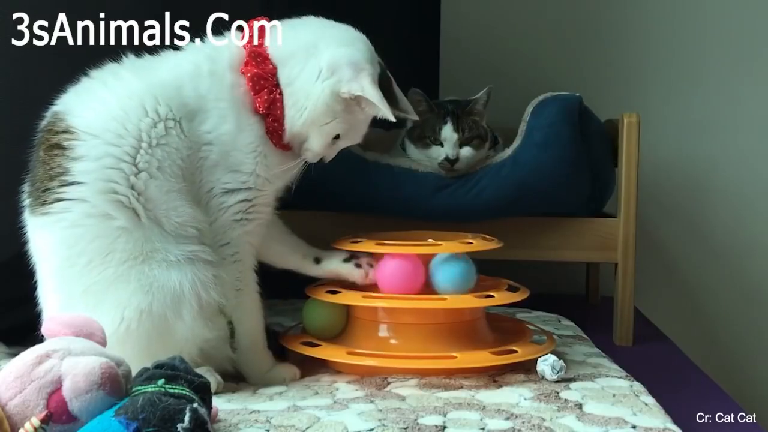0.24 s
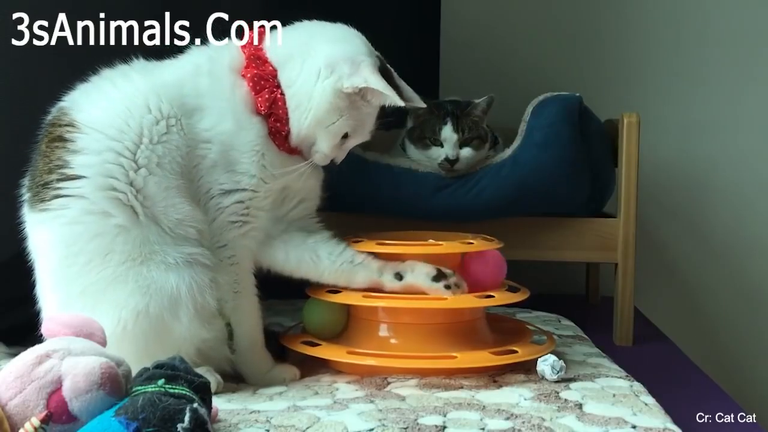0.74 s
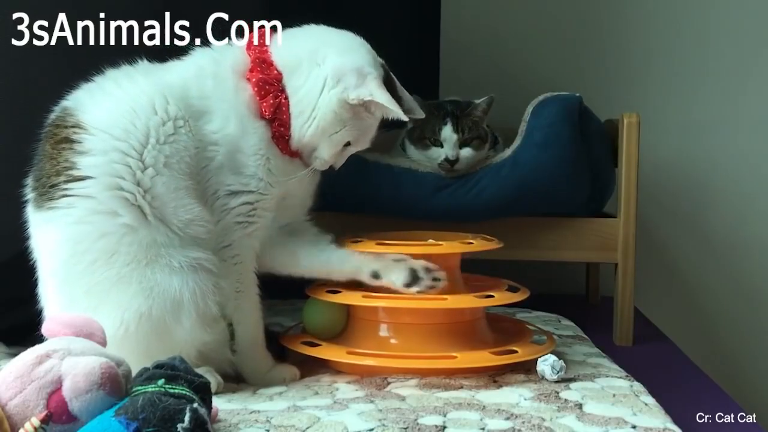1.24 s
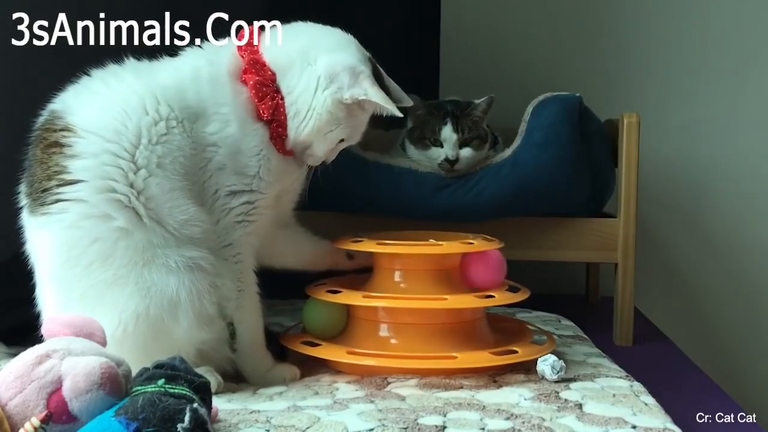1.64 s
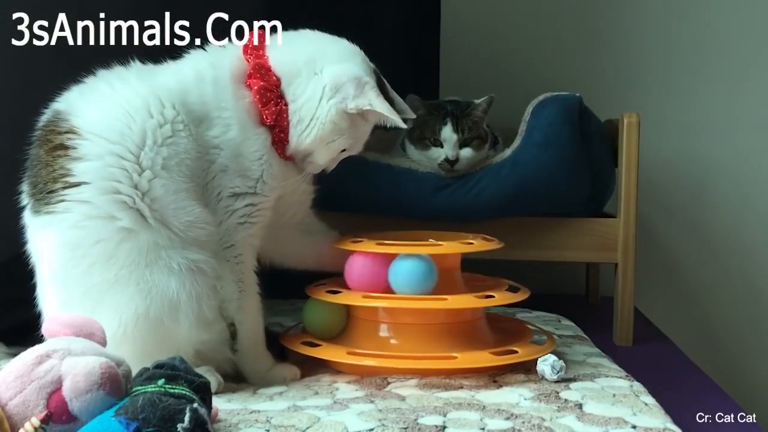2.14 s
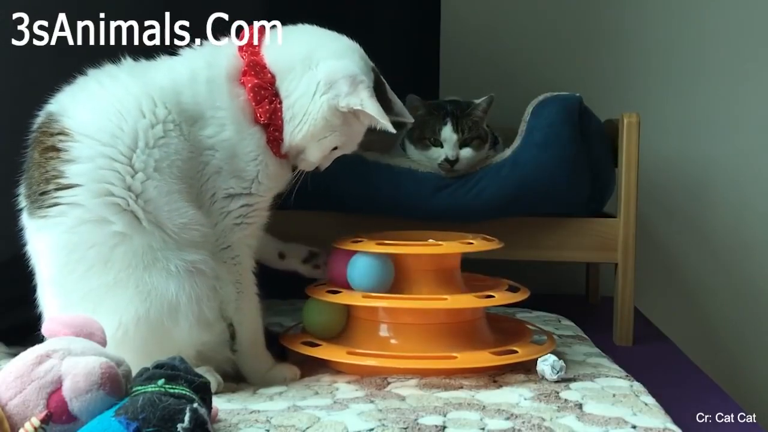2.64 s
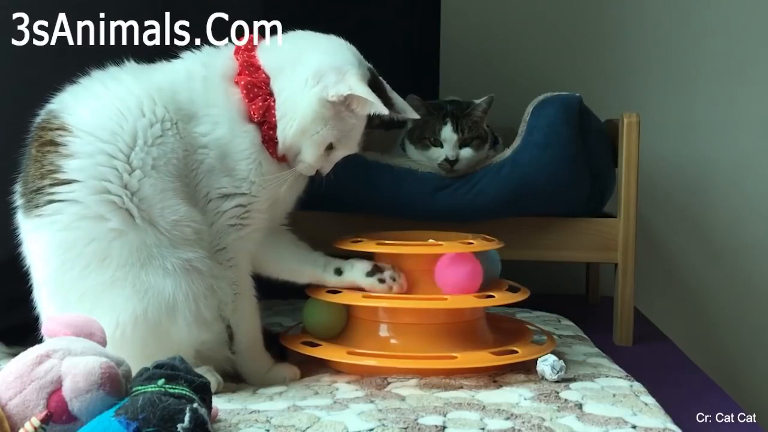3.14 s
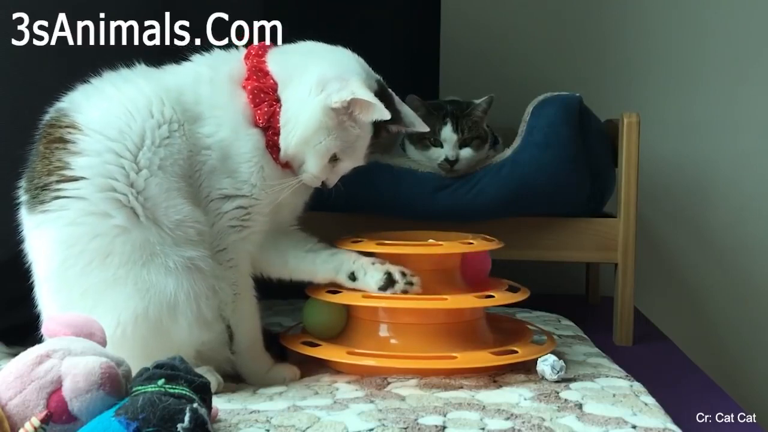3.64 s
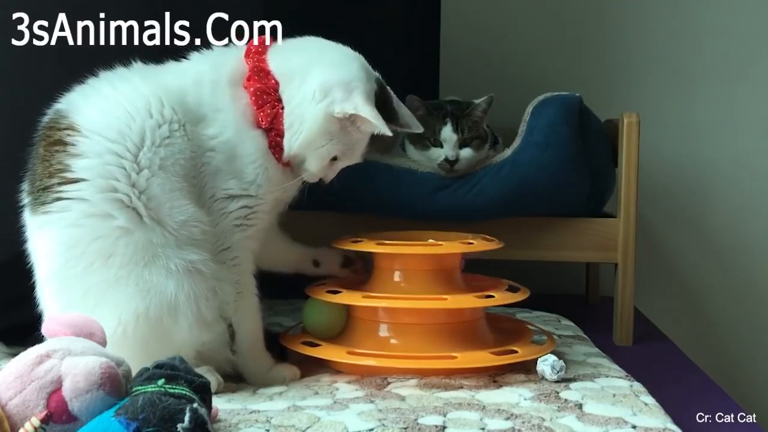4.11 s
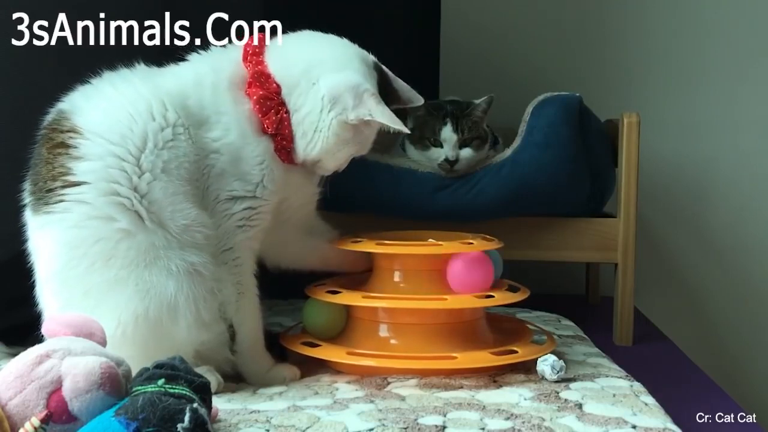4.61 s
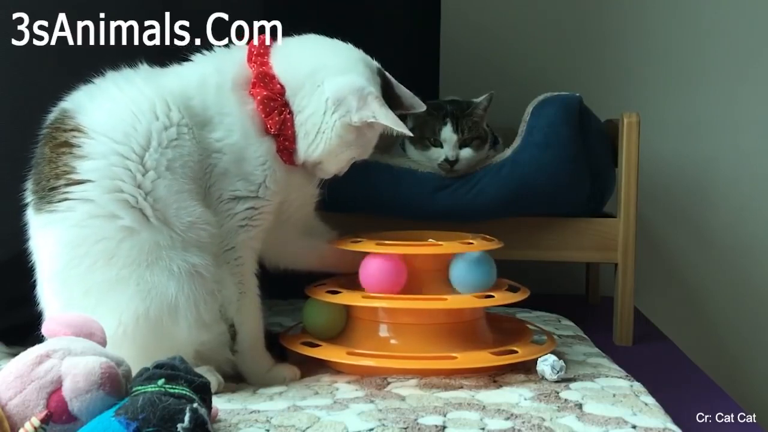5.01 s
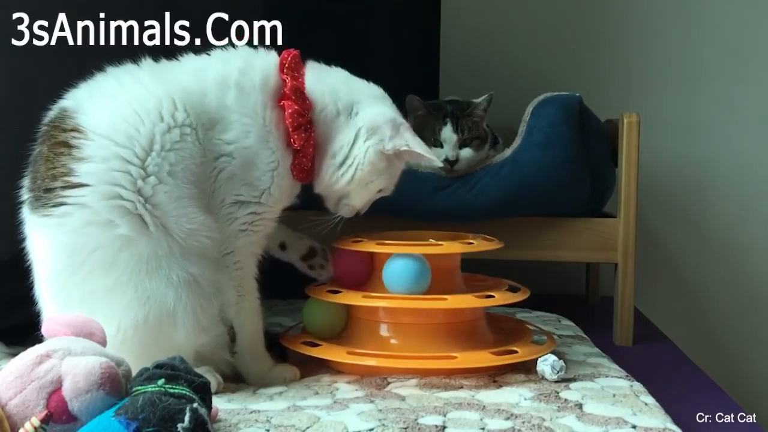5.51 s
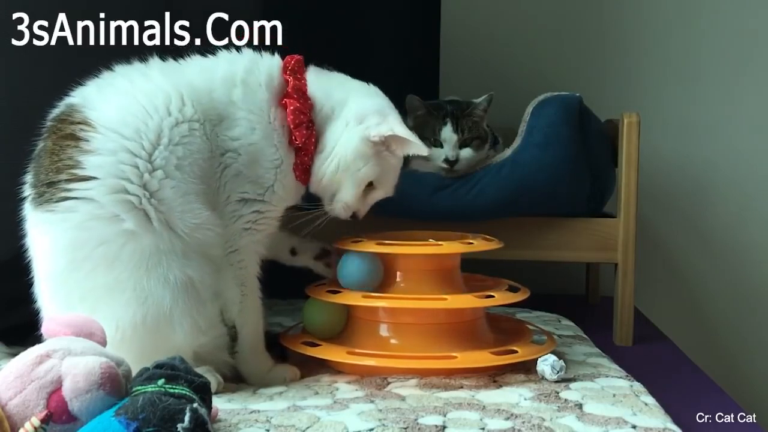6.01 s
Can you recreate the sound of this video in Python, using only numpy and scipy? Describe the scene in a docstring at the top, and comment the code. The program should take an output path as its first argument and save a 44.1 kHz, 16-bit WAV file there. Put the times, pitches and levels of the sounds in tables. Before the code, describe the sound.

A cat bats hollow plastic balls around a tiered plastic track. Quick clusters of dry clacks come at the start, after a second and a half, near three seconds and just after four, with faint rolling and grainy hisses between. A small pad squeak comes near five seconds, then a few weak ticks. A low machine hum runs beneath. Close single microphone, small room with short echoes.

```python
"""Hollow plastic balls clack in a tiered plastic track as a cat paws them, in a small room with close walls.
Each hit rings modes of ball, rim and tray under a short noise crack; a fainter, duller repeat comes soon after.
Pulses make the balls roll and skitter, short grainy hisses swell, and square hits ring the whole tower.
Fur brushes the rim as soft noise, and a paw pad squeaks once as a rough tone of wavering pitch.
Behind the toy a machine hums: steady tones, a drone that swells and dies away, rumble and airy hiss."""
import sys
import numpy as np
from scipy import signal
from scipy.fft import rfft, irfft
from scipy.io import wavfile

SR = 44100
rng = np.random.default_rng(int(sys.argv[2]) if len(sys.argv) > 2 else 0)


def int16_out(signal):
    """Quantize to a 16-bit WAV file."""
    q = np.round(np.clip(np.atleast_2d(signal).T, -1, 1) * 32767)
    wavfile.write(sys.argv[1], SR, q.astype(np.int16))


N = 276154
TIME = np.arange(N) / SR

# steady machine tones, mean level before they waver: [f/Hz, level/dB]
HUM_TONES = [(59.7, -50), (119, -62.5), (153.5, -60.5), (188, -64.5), (220.6, -53.5), (251.7, -65.5),
             (345, -69.5)]
# the drone swells and dies away: [t/s, level/dB]
DRONE_LEVEL = [(0.08, -46.5), (1.02, -48), (1.25, -40.5), (3.05, -39), (3.25, -51.5), (6.0, -52)]
DRONE_HZ = 93.55
# spectrum of the airy hiss: [f/Hz, relative level/dB]
AIR_COLOUR = [(200, -19.5), (400, -4), (500, -8.5), (740, -9.5), (1000, -11), (1290, -1.5), (1480, -6.5),
              (1900, -8.5), (2500, -16.5), (4500, -22), (7400, -24.5), (8800, -23.5), (10200, -30.5),
              (16000, -32.5)]
AIR_DB = -64.5
# spectrum of the low rumble: [f/Hz, relative level/dB]
RUMBLE_COLOUR = [(20, -48), (31, -20), (39, -16.5), (50, 0), (69, -7.5), (84, 1), (104, -6.5), (135, -11),
                 (172, -13.5), (260, -17.5), (330, -24.5), (450, -32), (700, -60)]
# level of the rumble: [t/s, level/dB]
RUMBLE_LEVEL = [(0.3, -42.5), (0.75, -47), (1.3, -44), (4.3, -45.5), (5.7, -47), (6.1, -44)]

# time for the room's echoes to fall 60 dB: [f/Hz, t60/s]
ROOM_T60 = [(250, 0.15), (1000, 0.19), (3500, 0.29), (9000, 0.23), (16000, 0.18)]
# colour of the room's echoes: [f/Hz, relative level/dB]
ROOM_COLOUR = [(330, -1), (550, 0), (950, -5), (1400, -0.5), (2400, 1), (5000, 0.5), (9000, -1.5)]
# echoes a second at first; time over which they crowd together (s)
ECHOES_PER_S, CROWDING_S = 500, 0.03
# the room decays separately in seven octave bands
EDGES = np.geomspace(125, 16000, 8)
OCTAVES = [(np.sqrt(low * high), signal.butter(2, [low, high], "band", fs=SR, output="sos"))
           for low, high in zip(EDGES, EDGES[1:])]

# fur brushing the rim: [start t/s, fade length/s, level/dB]
BRUSHES = [(0.429, .17, -60.5), (0.815, 0.16, -61), (5.942, 0.04, -63.5), (6.021, 0.033, -58.5)]
# spectrum of fur on plastic, and of the pad's rasp: [f/Hz, relative level/dB]
FUR_COLOUR = [(700, 7), (1900, 1.5), (2700, 0), (4500, -1.5), (5500, -3.5), (7000, 0.5), (9000, -10.5),
              (11000, -10.5), (15500, -19)]

# a pad sticks and slips on the plastic: start (s), level (dB) before it roughens
SQUEAK_S, SQUEAK_DB = 4.894, -47
# its pitch follows the speed of the slip, before jitter: [t/s, f/Hz]
SQUEAK_PITCH = [(4.899, 1740), (4.905, 1904), (4.918, 1775), (4.926, 1945), (4.946, 1750), (4.957, 1960)]
# partials of the squeak: [multiple of the pitch, relative level/dB]
SQUEAK_PARTIALS = [(1, 2), (2, -3.5), (4, -20)]
# the pad grips quickly and lets go slowly; the rasp of its landing dies sooner (s)
GRIP_S, LET_GO_S, RASP_S = 0.007, 0.094, 0.087

# short grainy hisses, some leading into hits: [start t/s, length/s, level/dB before the trim in hissing()]
HISSES = [(0.31, 0.063, -63), (1.513, 0.13, -53), (2.65, 0.093, -63), (2.927, 0.12, -55.5),
          (2.993, 0.086, -54), (4.162, 0.071, -58.5), (5.614, 0.067, -65)]
# spectrum of the grainy hisses: [f/Hz, relative level/dB]
HISS_COLOUR = [(1500, 1), (2700, -2.5), (3400, 7), (4400, -10), (7500, -7), (8500, 6.5), (10000, -6),
               (11500, 1), (15500, -5.5)]

# a pushed ball rolls until friction stops it: [start t/s, slowing length/s, level/dB before rolling()'s trim]
ROLLS = [(0.26, 0.24, -58), (1.55, 1.16, -61.5), (2.616, 0.15, -61), (2.928, 0.1, -53), (3.17, 0.84, -62),
         (4.24, 0.37, -68)]
# time to pick up speed (s); murmur of the balls idling between pushes (dB, before the same trim)
PUSH_S, IDLE_DB = 0.06, -71.5

# a struck ball skitters along the wall in tiny ticks: [start t/s, fade length/s, level/dB]
SKITTERS = [(0.287, 0.017, -53), (4.256, .095, -53), (4.38, .045, -59)]
# mean ticks a second; time for the run to build up (s)
SKITTER_PER_S, SKITTER_RISE_S = 420, 0.0075

# a square hit shakes the whole tower, which rings low: [t/s, level/dB, f/Hz, t60/s]
THUMPS = [(0.267, -38, 258, 0.17), (1.563, -36.5, 340.3, 0.19), (4.24, -44, 387, 0.11)]

# modes of the tray, before each strike shifts them: [f/Hz, relative level/dB, t60/s]
TRAY_MODES = [(340, -13, 0.024), (471, 4.5, 0.0086), (543, 1.5, 0.018), (655, 9.5, 0.0081),
              (885, 4.5, 0.012), (1032, 2, 0.016), (1266, 5, 0.0083)]
# modes of its thin rim: [f/Hz, relative level/dB, t60/s]
RIM_MODES = [(1520, 2.5, 0.01), (1786, 8.5, 0.0095), (1950, -9, 0.0083)]
# the hollow ball's lowest modes: [multiple of its pitch, relative level/dB, t60/s]
BALL_MODES = [(0.86, -16, 0.0092), (0.97, -1.5, 0.013), (1.029, 4.5, 0.0075)]
# the balls' modes as they spread in all directions: [f/Hz, relative level/dB, t60/s]
CLATTER_MODES = [(2630, -3, 0.007), (2970, 0.5, 0.0065), (3400, -2.5, 0.004), (4080, -12, 0.0043)]
# the plastic's crowded higher resonances: [f/Hz, relative level/dB]
SHELL_COLOUR = [(300, -17), (900, 5), (2000, 3.5), (2450, -3.5), (2850, -22), (3400, 3.5), (4100, 0),
                (4900, -2), (6300, 0.5), (7500, -5), (8400, 7.5), (9900, 0), (11000, 6.5), (13000, 2.5),
                (16000, -6)]
# a ball strikes its neighbour or the tray: [t/s, tray knock level/dB, f/Hz that the struck spot favours,
# rim level/dB, ball level/dB, ball pitch f/Hz, crack level/dB, crack tilt above 3 kHz/(dB per octave)]
HITS = [(0.0886, -41, 736, -55, -51.5, 2700, -61.5, -4), (0.257, -36, 960, -60, -54, 3040, -70, -11),
        (0.2652, -28.5, 654, -44, -31.5, 3080, -38.5, 3), (0.2805, -34.5, 565, -55, -45, 2750, -51, -8),
        (0.309, -34.5, 795, -45, -52, 3130, -49, -8), (0.3244, -37.5, 704, -51, -60, 2700, -54, -6),
        (0.3735, -39, 685, -58, -61, 3200, -65, -6), (0.3825, -41.5, 905, -55, -58, 3250, -64, -6),
        (0.393, -34.5, 690, -49.5, -62, 3100, -54, -8), (0.4073, -43.5, 830, -56, -47, 3150, -54.5, -5),
        (0.4217, -37, 724, -56, -66, 3100, -59, -7), (0.4345, -46, 720, -61, -71, 3100, -66, -6),
        (1.5024, -45.5, 480, -68, -68, 3200, -56, -4), (1.529, -54, 1200, -60, -51.5, 5350, -57, -3),
        (1.5522, -41, 550, -41, -58, 3280, -42, -5), (1.5631, -28, 480, -34.5, -34, 3360, -33, -3.5),
        (1.5700, -38.5, 370, -46, -45, 3200, -38, -10), (1.585, -47, 950, -37, -46, 3460, -49, -8),
        (1.6569, -44.5, 890, -63, -60, 3220, -50, -8), (1.663, -37, 790, -55, -56, 3220, -56.5, -7),
        (1.6775, -40, 940, -55, -59, 3200, -61, -6), (1.6846, -40.5, 706, -51, -60, 3140, -64.5, -5),
        (2.263, -49.5, 700, -58, -53.5, 3300, -52.5, 3), (2.6263, -31, 1170, -31.5, -35.5, 2660, -30, -2.5),
        (2.6374, -35, 1000, -41.5, -41.5, 3450, -46, 2), (2.6806, -43, 770, -57, -60, 3300, -56.5, 1),
        (2.6893, -48, 850, -62, -54, 3350, -61, -1), (2.7123, -40, 660, -61, -67, 3200, -55, 7),
        (2.847, -69, 900, -70, -58, 3170, -62, -2), (3.0763, -22, 1000, -35.5, -40, 4140, -32, -5.5),
        (3.0859, -34.5, 800, -43, -42, 2560, -50, -7), (3.1007, -27, 980, -50, -41.5, 3380, -41.5, -8.5),
        (3.1058, -36.5, 1050, -50, -52, 3220, -56, -8), (3.1175, -35, 900, -48, -54, 2650, -53.5, -7),
        (3.4815, -42.5, 640, -65, -76, 3200, -75, -6), (3.906, -50.5, 950, -61, -82, 3200, -74, -4),
        (4.1591, -41, 734, -55, -62, 3100, -61.5, -10), (4.175, -40.5, 596, -56, -68, 3200, -49, 1),
        (4.2373, -34, 730, -39, -36.5, 3420, -36, -6), (4.245, -55, 700, -37, -48, 2550, -47, -6),
        (4.2524, -39, 1100, -39, -46, 3200, -40.5, -8), (4.2545, -31.5, 560, -47, -50, 2580, -49.5, -6),
        (4.295, -28.5, 900, -43, -46, 3070, -51, -6), (4.3254, -35, 950, -49, -58, 3260, -57, -10),
        (4.3674, -32.5, 940, -45, -46, 2960, -48.5, -6.5), (4.382, -42, 900, -48, -50, 2800, -59.5, 0),
        (4.4343, -36.5, 856, -50.5, -60, 3140, -58.5, -9), (4.4438, -44.5, 950, -62, -59, 2900, -63.5, -12),
        (5.755, -44.5, 754, -56, -61, 3000, -67, -5), (5.799, -60, 900, -72, -71, 3200, -58.5, 2),
        (6.043, -64, 1100, -51, -58, 3150, -53, -12)]
# a hit is wholly soft when its crack lies this far under its knock (dB)
SOFT_SPAN_DB = 24
# mean wait for the repeat of a hard hit, and what a wholly soft one adds (s)
REPEAT_S, SOFT_REPEAT_S = 0.0098, 0.007
# how much fainter the repeat is (dB)
KNOCK_LOSS_DB, RING_LOSS_DB, CRACK_LOSS_DB = 14.5, 19, 18.5
# the pitch that the repeat favours (Hz); how much duller it cracks (dB per octave)
REPEAT_HZ, REPEAT_DULL_DB = 760, 18

CUTOFF_HZ = 16200


def from_db(db):
    """Decibels to gain."""
    return 10 ** (np.asarray(db) / 20)


def rms_one(x):
    """Scale to unit power."""
    return x / np.sqrt(np.mean(x ** 2) + 1e-20)


def one_blow(x):
    """Scale to the energy of 2 ms at unit power."""
    return x / np.sqrt(np.sum(x ** 2) / (0.002 * SR))


def add(out, s, sound):
    """Mix a sound in at a time."""
    start = int(np.clip(round(s * SR), 0, N))
    out[start:start + len(sound)] += sound[:N - start]


def in_time(points):
    """Read a curve at every sample."""
    s, value = np.transpose(points)
    return np.interp(TIME, s, value)


def swell(s, rise_s, fall_s):
    """An envelope that rises to 1 and runs down evenly."""
    return np.interp(TIME, [s, s + rise_s, s + rise_s + fall_s], [0, 1, 0])


def die_away(t, t60):
    """Exponential decay that falls 60 dB in t60."""
    return np.exp(-np.log(1000) * t / t60)


def build_up(t, rise_s):
    """Smooth onset of a strike."""
    return 1 - np.exp(-(t / rise_s) ** 2)


def drift(rate):
    """Random wander through about so many knots a second, scaled to unit power."""
    knots = rng.standard_normal(N // 20)
    return rms_one(np.interp(TIME * rate, np.arange(len(knots)), knots))


def at_hz(points, hz):
    """Read a spectrum on a log-frequency axis."""
    f, value = np.transpose(points)
    return np.interp(np.log(np.maximum(hz, 1)), np.log(f), value)


def coloured(x, spectrum, tilt_db=0):
    """Give a signal a spectrum, tilted above 3 kHz by so much an octave; unit power."""
    hz = np.fft.rfftfreq(len(x), 1 / SR)
    db = at_hz(spectrum, hz) + tilt_db * np.log2(np.maximum(hz, 3000))
    return rms_one(irfft(rfft(x) * from_db(db), len(x)))


def noise(spectrum):
    """Steady noise with a given spectrum."""
    return coloured(rng.standard_normal(N), spectrum)


def hum(waver_db=2.33, wander_rad=0.18):
    """Machine tones, wavering a little, over rumble and airy hiss."""
    def tone(hz):
        """A unit-power sine whose phase wanders."""
        turns = hz * TIME + rng.random()
        return np.sqrt(2) * np.sin(2 * np.pi * turns + wander_rad * drift(1.65))

    steady = sum(from_db(db + waver_db * drift(5)) * tone(hz) for hz, db in HUM_TONES)
    drone = from_db(in_time(DRONE_LEVEL)) * tone(DRONE_HZ)
    rumble = from_db(in_time(RUMBLE_LEVEL)) * noise(RUMBLE_COLOUR)
    air = from_db(AIR_DB) * noise(AIR_COLOUR)
    return steady + drone + rumble + air


def room(x, wet_db, gap_s, treble_loss_db):
    """The echoes alone: close walls return separate reflections that crowd into a tail and die by band."""
    t = np.arange(SR // 3) / SR
    response = np.zeros(len(t))
    arrives = rng.random(len(t)) < ECHOES_PER_S * (1 + (t / CROWDING_S) ** 2) / SR
    onset = np.clip(t / gap_s - 1, 0, 1)   # silent until the gap has passed
    for octave, (hz, band) in enumerate(OCTAVES):
        decay = die_away(t, at_hz(ROOM_T60, hz)) * onset
        # each echo weakens as they crowd
        echoes = arrives * rng.choice([-1, 1], len(t)) * decay / np.hypot(1, t / CROWDING_S)
        in_band = signal.sosfilt(band, echoes / np.linalg.norm(echoes))
        response += from_db(wet_db - treble_loss_db * octave) * in_band
    colour = from_db(at_hz(ROOM_COLOUR, np.fft.rfftfreq(2 * len(t), 1 / SR)))
    response = irfft(rfft(response, 2 * len(t)) * colour)[:len(t)]
    return signal.fftconvolve(x, response)


def brushing(rise_s=0.015):
    """Each stroke of fur is soft noise that swells quickly and fades."""
    pressure = sum(from_db(db) * swell(s, rise_s, length) for s, length, db in BRUSHES)
    return pressure * noise(FUR_COLOUR)


def squeak(rough_db=4.0, rasp_db=-7, jitter=0.05):
    """The pad lands with a rasp, then uneven stick and slip gives a short rough tone that trails off."""
    pitch = in_time(SQUEAK_PITCH) * (1 + jitter * drift(1200))
    phase = 2 * np.pi * np.cumsum(pitch) / SR
    tone = rms_one(sum(from_db(db) * np.sin(k * phase) for k, db in SQUEAK_PARTIALS))
    grip = swell(SQUEAK_S, GRIP_S, LET_GO_S) ** 2 * from_db(rough_db * drift(250))
    rasp = from_db(rasp_db) * swell(SQUEAK_S, GRIP_S, RASP_S) * noise(FUR_COLOUR)
    return from_db(SQUEAK_DB) * (grip * tone + rasp)


def hissing(grain_db=2.5, trim_db=-1):
    """Each hiss is a short swell of bright noise, its level flickering to make it grainy."""
    grainy = rng.standard_normal(N) * from_db(grain_db * drift(500))
    level = sum(from_db(db) * np.sin(np.pi * np.clip((TIME - s) / length, 0, 1))
                for s, length, db in HISSES)
    return from_db(trim_db) * level * coloured(grainy, HISS_COLOUR)


def strike(modes, spot_db, rise_s):
    """Modes ring after one blow, their strength and pitch shifting a little with the spot."""
    hz, db, t60 = np.transpose(modes)[:, :, None]
    t = TIME[:SR // 12]
    gain = from_db(db + np.reshape(spot_db, (-1, 1)) + rng.standard_normal(hz.shape))
    shifted_hz = hz * rng.uniform(0.975, 1.025, hz.shape)
    turns = shifted_hz * (t - rise_s / 2) + 0.2 * rng.random(hz.shape)
    ring = np.sum(gain * die_away(t, t60) * np.sin(2 * np.pi * turns), axis=0)
    return one_blow(ring * build_up(t, rise_s))


def rolling(bumps_per_s=260, size_db=4, trim_db=-3):
    """Small bumps in the groove keep the tray murmuring, louder as a ball rolls faster."""
    sizes = from_db(size_db * np.minimum(rng.exponential(1, N), 2))
    bumps = (rng.random(N) < bumps_per_s / SR) * rng.choice([-1, 1], N) * sizes
    murmur = signal.fftconvolve(bumps, strike(TRAY_MODES, 0, rise_s=0.0007))[:N]
    soft = signal.sosfilt(signal.butter(2, [450, 1100], "band", fs=SR, output="sos"), murmur)
    speed = from_db(IDLE_DB) + sum(from_db(db) * swell(s, PUSH_S, length) for s, length, db in ROLLS)
    return from_db(trim_db) * speed * rms_one(soft)


def skittering(rim_db=-4):
    """Tiny uneven ticks keep the ball and the rim ringing between the hits."""
    sizes = np.sqrt(rng.random(N))
    ticks = (rng.random(N) < SKITTER_PER_S / SR) * rng.choice([-1, 1], N) * sizes
    ball = strike(CLATTER_MODES, 0, rise_s=0.00044)
    rim = from_db(rim_db) * strike(RIM_MODES, 0, rise_s=0.0005)
    force = sum(from_db(db) * swell(s, SKITTER_RISE_S, length) for s, length, db in SKITTERS)
    return force * rms_one(signal.fftconvolve(ticks, ball + rim)[:N])


def thumps():
    """The tower's low ring outlasts the clack that starts it."""
    out, t = np.zeros(N), TIME[:SR // 2]
    for s, db, hz, t60 in THUMPS:
        add(out, s, from_db(db) * die_away(t, t60) * np.sin(2 * np.pi * hz * t))
    return out


def crack(bright_db, rise_s=0.0004, t60=0.014):
    """The ball's higher modes die so fast that they merge into a short burst."""
    t = TIME[:SR // 12]
    burst = rng.standard_normal(len(t)) * die_away(t, t60) * build_up(t, rise_s)
    return one_blow(coloured(burst, SHELL_COLOUR, bright_db) * np.linspace(1, 0, len(t)))


def softness(tray_db, crack_db):
    """0 for a sharp clack, 1 for a dull knock."""
    return np.clip((tray_db - crack_db) / SOFT_SPAN_DB, 0, 1)


def hits_and_repeats(uneven=0.126):
    """Every hit, then a fainter, duller repeat about 10 ms later, or more after a soft hit."""
    chances = rng.uniform(-1.06, 1, len(HITS))
    for hit, chance in zip(HITS, chances):
        s, tray_db, spot_hz, rim_db, ring_db, ring_hz, crack_db, bright_db = hit
        yield hit
        wait = (REPEAT_S + SOFT_REPEAT_S * softness(tray_db, crack_db)) * (1 + uneven * chance)
        yield (s + wait, tray_db - KNOCK_LOSS_DB, REPEAT_HZ, rim_db - RING_LOSS_DB,
               ring_db - RING_LOSS_DB, ring_hz, crack_db - CRACK_LOSS_DB, bright_db - REPEAT_DULL_DB)


def clacks(spread_db=-3.5, favour_db=9, soft_favour_db=7, favour_octaves=0.78):
    """Each clack cracks, rings ball and rim, and knocks the tray most in modes near its favoured pitch."""
    out = np.zeros(N)
    for s, tray_db, spot_hz, rim_db, ring_db, ring_hz, crack_db, bright_db in hits_and_repeats():
        # a soft clack has little crack: its knock builds up slowly and wakes fewer modes
        soft = softness(tray_db, crack_db)
        octaves = np.log2(np.array(TRAY_MODES)[:, 0] / spot_hz) * (1 + 0.26 * soft)
        spot_db = (favour_db + soft_favour_db * soft) * np.exp(-(octaves / favour_octaves) ** 2)
        knock = from_db(tray_db) * strike(TRAY_MODES, spot_db, rise_s=0.0013 + 0.0018 * soft ** 2)
        rim = from_db(rim_db) * strike(RIM_MODES, 0, rise_s=0.00091)
        ball_modes = [(k * ring_hz, db, t60) for k, db, t60 in BALL_MODES]
        ring = from_db(ring_db) * strike(ball_modes, 0, rise_s=0.00081)
        snap = from_db(crack_db) * crack(bright_db)
        add(out, s, knock + rim + ring + snap)
        # the walls hear the toy from all sides, so the ball's ring comes back as a broader clatter
        clatter = from_db(ring_db + spread_db) * strike(CLATTER_MODES, 0, rise_s=0.00044)
        # every clack draws its own echoes
        to_walls = knock + rim + clatter + snap
        add(out, s, room(to_walls, wet_db=-5.5, gap_s=0.0017, treble_loss_db=0.02))
    return out


def scene():
    """The toy and the paw in the humming room."""
    soft_sounds = rolling() + brushing() + squeak()
    echoes = room(soft_sounds, wet_db=-1.5, gap_s=0.0026, treble_loss_db=2.5)[:N]
    hits = clacks() + thumps() + skittering()
    return (hum() + soft_sounds + echoes + hissing() + hits)[None]


def record(dry):
    """One microphone channel, its top cut steeply by an elliptic low-pass."""
    return signal.sosfilt(signal.ellip(10, 0.1, 80, CUTOFF_HZ, fs=SR, output="sos"), dry)


dry = scene()
out = record(dry)
int16_out(out)
```